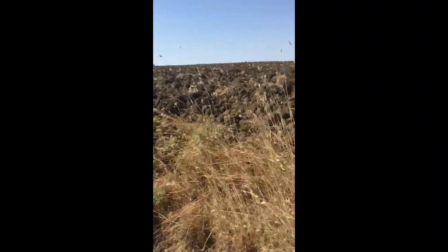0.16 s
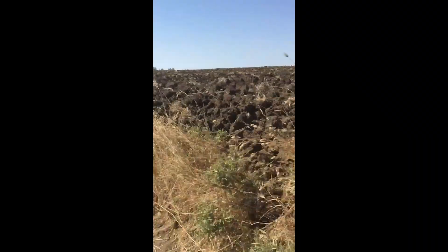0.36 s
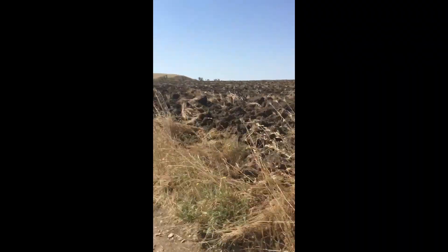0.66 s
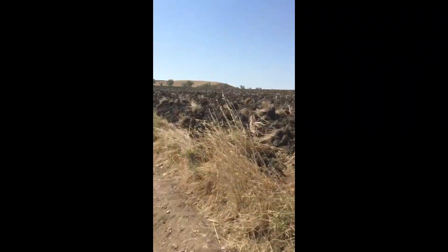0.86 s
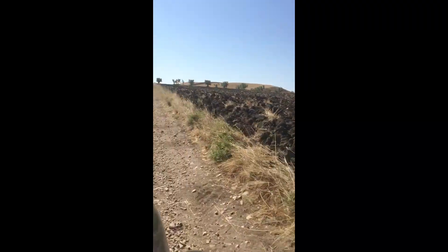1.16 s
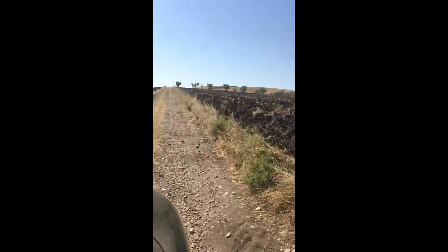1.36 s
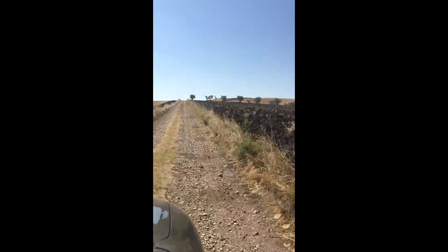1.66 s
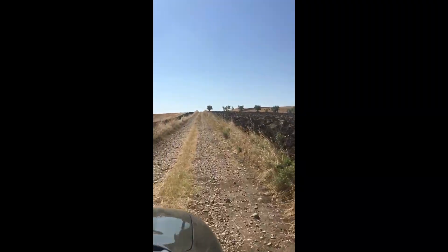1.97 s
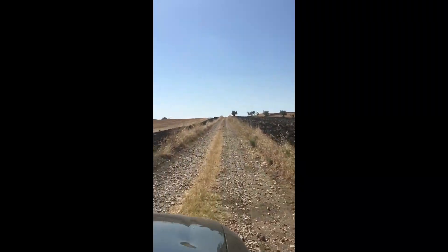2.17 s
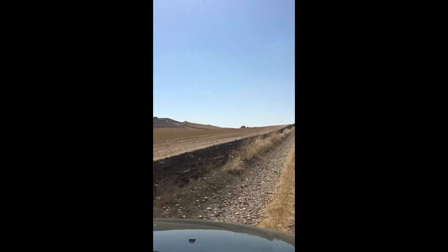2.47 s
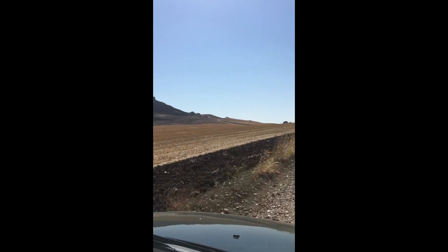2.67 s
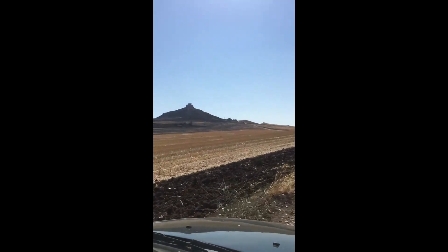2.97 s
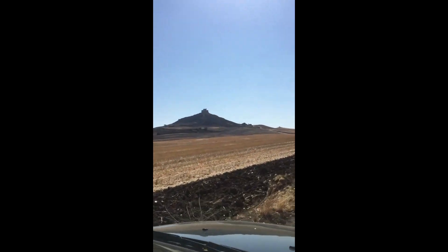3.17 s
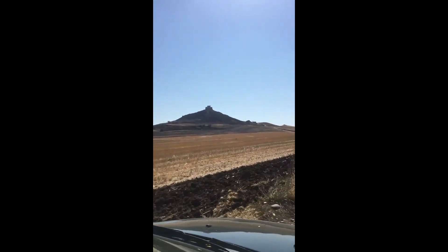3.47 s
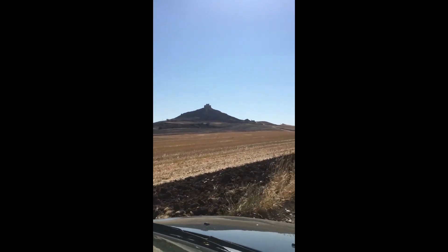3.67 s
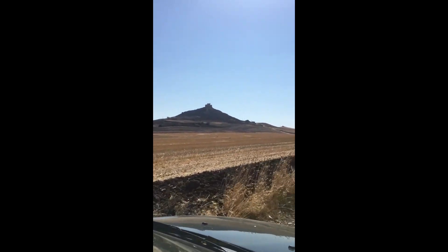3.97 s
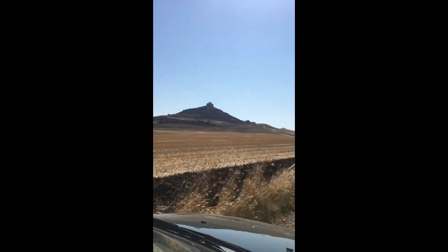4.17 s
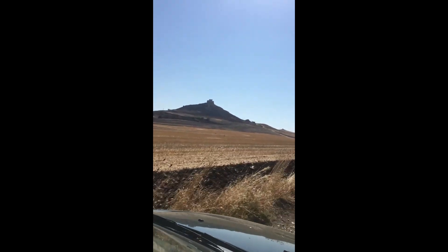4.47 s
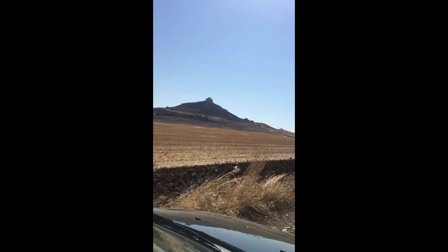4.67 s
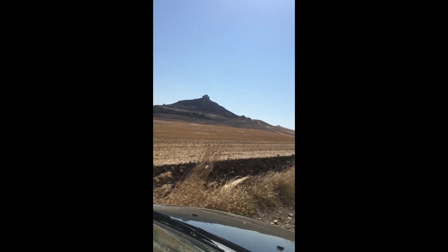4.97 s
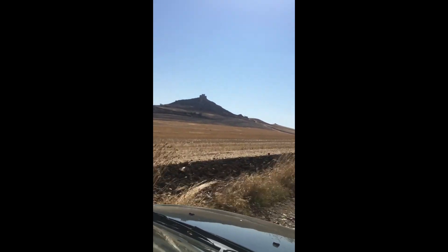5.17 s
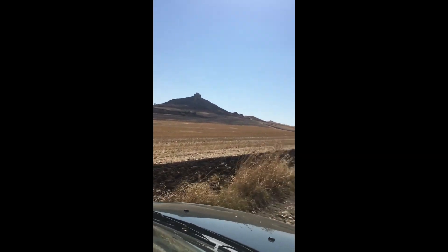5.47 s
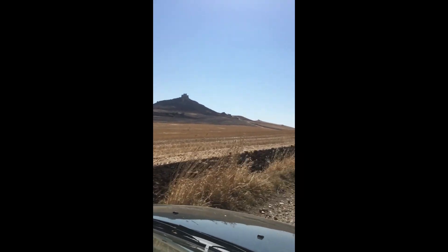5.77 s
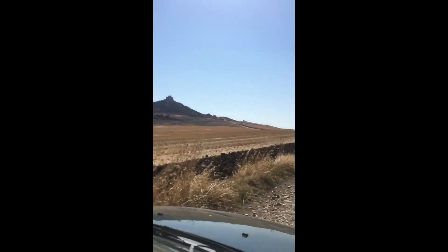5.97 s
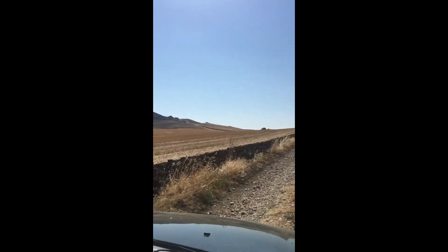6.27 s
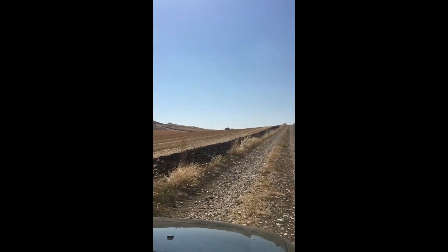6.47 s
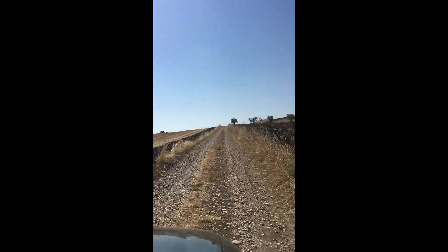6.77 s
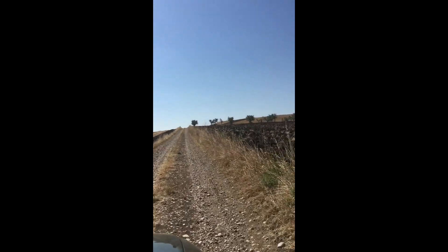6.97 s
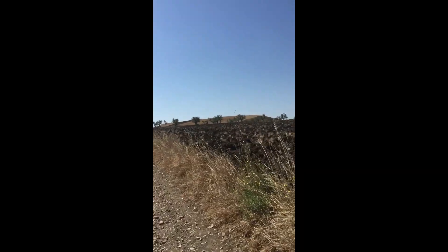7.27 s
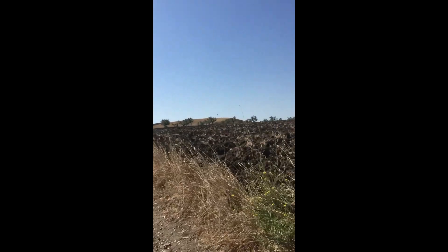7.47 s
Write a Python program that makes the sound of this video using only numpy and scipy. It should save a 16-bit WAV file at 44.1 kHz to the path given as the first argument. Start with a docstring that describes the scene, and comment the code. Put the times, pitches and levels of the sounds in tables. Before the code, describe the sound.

A car drives on a gravel track, heard from its open side window with the microphone in the airstream. Throughout, a deep rumble surges with ruts and tyres crunch small stones, quietening very slightly. From 0 to 1 s wind is strongest: airy hiss, fluttering gusts and blunt puffs, the hardest at 0.4 s, with a sharp grit tick near 0.5. Stones knock under the floor at 1.0 and in a run from 1.4 to 2.2 s, ending with a heavy thump at 2.1. After a calmer, less hissy second, a knock and gust hit at 3.3, then the loudest hollow clunk at 3.95. A low engine boom swells from 4 to 5.4 s, with knocks at 4.6 and 5.2 and a bright tick at 4.85. It dips near 5.9, returns from 6.3 to 7 and fades. Ticks come at 6.6 to 6.7; rumble, crunch and rising hiss continue to a last puff at 7.6.

```python
"""Tyres crunch along a gravel track under a rumbling car, heard at its open side window.
Filtered noise makes the rumble and roar, random grains the crushed stones; ruts jolt the rumble.
Stones knock under the floor as damped kicks with a noisy rattle, and grit ticks on the panels as noise bursts.
Wind hisses at the window frame and buffets the microphone in noise lumps and single puffs.
The engine booms as a sine at its firing rate, strongest near the cabin's air resonance."""
import sys
import numpy as np
from scipy import signal
from scipy.fft import rfft, irfft, next_fast_len
from scipy.io import wavfile
from scipy.ndimage import uniform_filter1d, map_coordinates

SR = 44100
rng = np.random.default_rng(int(sys.argv[2]) if len(sys.argv) > 2 else 0)


def generate_wav(sig):
    """Save sig (samples, or channels by samples) to the path in sys.argv[1] as 16-bit PCM at SR."""
    pcm = np.round(np.clip(np.atleast_2d(sig).T, -1, 1) * 32767).astype(np.int16)
    wavfile.write(sys.argv[1], SR, pcm)


N = 336042  # length in samples


def amp(db):
    """Level law: an amplitude ratio is ten to the power of dB / 20."""
    return 10 ** (np.asarray(db) / 20)


def unit(x):
    """Power normalisation: x scaled to rms 1."""
    return x / np.sqrt(np.mean(x ** 2) + 1e-20)


def curves(rows):
    """Linear interpolation: one value per sample for each column after the time."""
    seconds, *columns = np.transpose(rows)
    t = np.arange(N) / SR
    return [np.interp(t, seconds, column) for column in columns]


def wobble(rate):
    """Random modulation: a smooth curve through normally distributed knots, rate knots a second."""
    knots = rng.standard_normal(4096)
    return map_coordinates(knots, [np.arange(N) * rate / SR], mode="wrap")


def swell(t, length):
    """Raised-cosine envelope: a smooth rise and fall of height 1, length seconds either side of t = 0."""
    return np.cos(np.pi / 2 * np.clip(t / length, -1, 1)) ** 2


def shaped(x, spectrum):
    """Linear filtering: x is weighted in frequency by (Hz, dB) points on a log axis."""
    size = next_fast_len(len(x) + 8192)
    hz, db = np.transpose(spectrum)
    bins_hz = np.fft.rfftfreq(size, 1 / SR)
    gain = amp(np.interp(np.log(bins_hz + 1), np.log(hz), db))
    return irfft(rfft(x, size) * gain, size)[:len(x)]


def noise(spectrum, size=N):
    """Coloured noise: filtered white noise of rms 1."""
    return unit(shaped(rng.standard_normal(size), spectrum))


def grains(spectrum, rate, spread_db, t60):
    """Shot noise: about rate bursts a second of uneven size, each falling 60 dB in t60 s, at rms 1."""
    strikes = rng.random(N) < rate / SR
    energy = strikes * amp(spread_db * np.clip(rng.standard_normal(N), -2, 2)) ** 2
    fade = amp(-60 / (t60 * SR)) ** 2  # energy kept from one sample to the next
    envelope = np.sqrt(signal.lfilter([1], [1, -fade], energy))
    return unit(shaped(envelope * rng.standard_normal(N), spectrum))


def patchy(x, depth_db):
    """Time-frequency modulation: the gain flickers from band to band and moment to moment; rms 1."""
    z = signal.stft(x, nperseg=512)[2]
    field = rng.standard_normal(z.shape)
    field = uniform_filter1d(field, size=4, axis=0)  # across bands
    field = uniform_filter1d(field, size=3, axis=1)  # across time
    flickering = signal.istft(z * amp(depth_db * unit(field)), nperseg=512)[1]
    return unit(flickering[:len(x)])


def push(t, hz, rise, sag):
    """Damped oscillation: pressure peaks after rise cycles of the starting pitch hz, which then sags."""
    age = hz * t / rise
    envelope = (age * np.exp(1 - age)) ** 2
    return envelope * np.sin(2 * np.pi * np.log1p(sag * hz * t) / sag)


def add(track, s, sound):
    """Superposition: the sound is summed into the track from s seconds on."""
    start = max(round(s * SR), 0)
    room = track[start:start + len(sound)]
    room += sound[:len(room)]


# Engine speed. Each row: time in seconds, firing rate in Hz.
FIRING_RATE = [(0, 56.8), (1.2, 59.1), (2.7, 60.2), (3.2, 61.1), (4.1, 61.3), (4.6, 62.5), (5, 61.3),
               (6.6, 59.1), (7.62, 59.8)]
# How hard the engine pulls. Each row: time in seconds, nominal boom at resonance in dB.
LOAD_CURVE = [(0, -50), (1.2, -41.5), (3.8, -39), (4.1, -32.5), (5.4, -34), (5.9, -41), (6.3, -32.5),
              (7, -33.5), (7.62, -48)]
CABIN_HZ, CABIN_WIDTH_HZ = 62.5, 5.5  # the cabin's air resonance


def engine():
    """Forced resonance: the boom follows load, grows near the cabin resonance and throbs unevenly."""
    hz, = curves(FIRING_RATE)
    load_db, = curves(LOAD_CURVE)
    resonance = 1 / np.hypot(1, 2 * (hz - CABIN_HZ) / CABIN_WIDTH_HZ)
    phase = 2 * np.pi * np.cumsum(hz) / SR + 0.54 * wobble(9)
    throb_db = 2.9 * wobble(9)
    return resonance * amp(load_db + 2.5 + throb_db) * unit(np.sin(phase))


# The airstream at the window frame. Each row: time in seconds, air hiss in dB, fine fizz in dB.
AIRSTREAM_LEVELS = [(0, -53, -69), (.5, -53, -67), (1.4, -59, -66.5), (2, -57.5, -63.5), (2.3, -62.5, -71),
                    (3.2, -65, -77), (6.35, -62, -76), (7.1, -60.5, -73.5), (7.62, -58, -68)]
# Gusts on the microphone. Each row: peak time in seconds, rise and fall time (each) in seconds,
# nominal peak level in dB.
GUST_EVENTS = [(0.118, 0.12, -34), (0.602, 0.056, -33), (0.661, .04, -33), (0.798, 0.1, -32),
               (.89, 0.054, -32), (1.47, 0.096, -36), (1.72, 0.09, -38), (1.94, .08, -30),
               (2.024, .06, -33.5), (2.458, .1, -37.5), (3.083, 0.15, -40), (3.314, 0.047, -28.5),
               (3.616, 0.13, -36.5), (3.974, .06, -33), (4.269, 0.084, -32.5), (4.93, 0.069, -37.5),
               (5.57, 0.068, -33.5), (6.324, 0.053, -34.5), (6.76, 0.15, -38.5)]
# Eddies bursting on the microphone. Each row: start in seconds, nominal level in dB, nominal pitch in Hz.
PUFF_EVENTS = [(0.129, -19, 294), (0.317, -22, 517), (0.387, -8.5, 323), (0.658, -20.5, 383),
               (0.711, -15, 195), (.795, -17, 480), (0.8813, -16.5, 380), (1.178, -19.5, 126),
               (4.266, -23, 453), (5.676, -19.5, 367), (5.891, -19, 440), (6.731, -20, 227),
               (6.778, -21, 255), (7.603, -16.5, 282)]
# Spectra of the lumps, their flutter, the hiss and the fizz. Each row: frequency in Hz, relative level in dB.
LUMP_SPECTRUM = [(60, -23), (130, -9), (270, 3.5), (430, -8), (600, -5), (900, -24), (1400, -29),
                 (2500, -49), (6000, -64)]
FLUTTER_SPECTRUM = [(200, -10.5), (420, -1.5), (620, 3), (950, -4.5), (1400, -6), (2500, -38), (6000, -55)]
HISS_SPECTRUM = [(1500, -0.5), (3300, 4), (4400, -1), (5800, 1), (7000, -6.5), (9000, -4), (12000, -23),
                 (16000, -39)]
FIZZ_SPECTRUM = [(4000, -7), (8000, -6), (11000, 0.5), (16000, 0)]
BUFFET_DB, BUFFET_SWAY_DB = -40, 1.5  # the nominal buffeting between gusts, and how much it sways


def wind():
    """Turbulence: air hisses and sputters at the frame; gusts reach the microphone as lumps and puffs."""
    hiss_db, fizz_db = curves(AIRSTREAM_LEVELS)
    t = np.arange(N) / SR
    power = amp(BUFFET_DB + BUFFET_SWAY_DB * wobble(10)) ** 2
    for s, length, db in GUST_EVENTS:
        power = power + (amp(db) * swell(t - s, length)) ** 2
    buffet_db = 10 * np.log10(power)
    fast_lumps = amp(3.1 * wobble(90)) * noise(LUMP_SPECTRUM)
    lumps = amp(buffet_db - 2.0) * patchy(fast_lumps, depth_db=2.5)
    # stronger gusts break into smaller eddies: a brighter flutter that grows faster than the lumps
    flutter_db = -43.0 + 2.07 * (buffet_db + 34.5)
    flutter = amp(flutter_db) * grains(FLUTTER_SPECTRUM, rate=200, spread_db=6.0, t60=0.025)
    steady_hiss = amp(0.5) * noise(HISS_SPECTRUM)
    sputter = amp(-0.5) * grains(HISS_SPECTRUM, rate=140, spread_db=5.5, t60=0.033)
    hiss = amp(hiss_db) * patchy(steady_hiss + sputter, depth_db=2.5)
    fizz = amp(fizz_db + 0.6 * wobble(20)) * noise(FIZZ_SPECTRUM)
    air = lumps + flutter + hiss + fizz
    puff_t = np.arange(SR // 10) / SR
    for s, db, hz in PUFF_EVENTS:
        # the pitch starts high and has sagged close to hz at the peak
        add(air, s, amp(db) * push(puff_t, hz * 2.72, rise=1.92, sag=1.0))
    return air


# Grit on the panels. Each row: start in seconds, nominal level in dB, pitch in Hz, 60 dB decay in seconds.
GRIT_STRIKES = [(0.538, -25.5, 4600, 0.01), (.607, -28, 4570, 0.0092), (1.355, -44, 5600, .04),
                (1.4168, -31.5, 5900, 0.045), (1.605, -39.5, 8900, 0.061), (1.736, -42.5, 5480, .05),
                (1.914, -43, 5000, 0.17), (1.951, -43, 5000, .06), (2.016, -40, 6040, 0.028),
                (2.1476, -43, 10000, 0.018), (2.234, -47, 11000, .02), (2.7403, -45, 5970, 0.031),
                (2.922, -40, 9050, 0.016), (3.447, -45, 4500, .03), (3.947, -39.5, 4000, 0.069),
                (4.071, -42.5, 3880, 0.089), (4.455, -43.5, 6900, 0.045), (4.588, -44, 8000, .03),
                (4.8487, -30, 4900, 0.023), (5.029, -46, 7500, .025), (5.773, -43.5, 8010, 0.029),
                (6.5904, -37, 8380, 0.0076), (6.6323, -47, 9000, .04), (6.7074, -36, 8500, 0.059)]


def ticks():
    """Impact excitation: grit strikes the panels with a short bright splash around its own pitch."""
    track, t = np.zeros(N), np.arange(SR // 8) / SR
    for s, db, hz, t60 in GRIT_STRIKES:
        spectrum = [(hz / 4, -28), (hz / 4.8, -8), (hz, 0), (hz * 1.57, -9), (hz * 3, -26)]
        splash = noise(spectrum, size=len(t))
        onset = 1 - np.exp(-t / 0.0002)
        add(track, s, amp(db - 4.0 - 60 * t / t60) * onset * splash)
    return track


# Stones under the floor. Each row: start in seconds, nominal level in dB, nominal pitch in Hz,
# nominal rattle in dB relative to that level.
STONE_KNOCKS = [(0.4173, -19.5, 880, -13), (0.664, -26, 1360, -10), (1.0135, -21, 1150, -16),
                (1.356, -18, 950, -13), (1.4188, -16, 680, -10), (1.505, -20.5, 810, -18),
                (1.531, -25, 1245, -24), (1.7385, -18, 680, -1), (1.905, -21, 1220, -8),
                (2.0945, -10, 480, -6), (2.138, -21.5, 1130, -28), (2.184, -19.5, 680, -18),
                (3.3072, -11.5, 640, -11.5), (3.329, -33, 851, -23), (3.4462, -17, 1200, -15),
                (3.6, -17, 1110, -11), (3.614, -21, 985, -16), (3.9468, -8.5, 407, -4),
                (3.954, -14.5, 875, -10.5), (3.975, -17, 1000, -12), (4.151, -21, 1060, -22),
                (4.296, -22.5, 1400, -10.5), (4.588, -13, 1220, -17), (4.885, -21.5, 889, -14.5),
                (5.116, -27, 1106, -7), (5.2275, -18.5, 484, -7), (5.801, -24, 780, -8)]
# What the floor lets through to the cabin. Each row: frequency in Hz, gain in dB.
FLOOR_TRANSMISSION = [(2500, -0.5), (3100, -4), (5000, -14), (12000, -16)]


def knocks():
    """Impact and transmission: stones crack, kick, thud and rattle the pan, heard through the floor."""
    track, t = np.zeros(N), np.arange(SR // 6) / SR
    for s, db, hz, rattle_db in STONE_KNOCKS:
        crack = amp(-20) * push(t, 2050, rise=0.58, sag=0.43)
        kick = amp(-2.5) * push(t, hz * 1.49, rise=1.0, sag=0.36)
        thud = amp(-11.0) * push(t, hz * 0.5, rise=1.0, sag=0.19)
        spectrum = [(hz / 5, -18), (hz / 2, -5), (hz, 0), (hz * 2, -6), (hz * 5, -27), (hz * 16, -50)]
        rattle = noise(spectrum, size=len(t))
        rattle *= amp(rattle_db + 0.5 - 60 * t / 0.05)  # falls 60 dB in 0.05 s
        rattle *= 1 - np.exp(-t / 0.0014)
        add(track, s, amp(db) * (kick + crack + thud + rattle))
    return shaped(track, FLOOR_TRANSMISSION)


# Ruts and bumps that jolt the body. Each row: peak time in seconds, nominal peak rumble in dB.
RUT_JOLTS = [(.02, -26.5), (.375, -28.5), (.71, -28), (1.17, -36), (1.4, -32), (1.94, -31), (2.13, -23),
             (2.3, -27), (2.46, -26.5), (2.65, -31), (3.14, -29), (3.29, -27), (3.6, -23.5), (3.73, -27),
             (4, -25.5), (4.13, -28), (4.29, -28.5), (4.64, -22.5), (4.89, -22.5), (5.2, -26),
             (5.33, -29.5), (5.54, -31), (5.82, -24), (5.94, -30), (6.54, -26.5), (6.73, -27), (6.85, -27),
             (7.16, -26), (7.43, -29)]
# Spectra of the body's rumble, the tyres' roar and the crushed stones.
# Each row: frequency in Hz, relative level in dB.
RUMBLE_SPECTRUM = [(15, -49), (25, -25), (33, 1), (45, -2.5), (70, 1.5), (100, -2), (140, -5), (200, -15),
                   (400, -30), (1000, -71)]
TYRE_SPECTRUM = [(150, -0.5), (400, 2.5), (620, 4.5), (1000, -2.5), (1300, 0), (1620, -3), (1800, -0.5),
                 (2150, -9.5), (3600, -18), (5000, -25.5), (9000, -31), (16000, -45)]
STONE_SPECTRUM = [(120, -21), (300, -0.5), (650, -2), (1200, -4), (1900, -24), (3000, -18), (6000, -33),
                  (16000, -45)]
RUMBLE_DB, RUMBLE_SWAY_DB = -34, 2  # the nominal rumble between ruts, and how much it sways
RUT_RISE_S, RUT_FALL_S = 0.03, 0.039  # a jolt builds quickly, then the suspension settles
CRUNCH_DB, CRUNCH_DB_PER_S = -40, -0.27  # the tyres quieten gradually


def road():
    """Random excitation: ruts jolt the rumbling body; tyres roar and crush a stream of small stones."""
    t = np.arange(N) / SR
    power = amp(RUMBLE_DB + RUMBLE_SWAY_DB * wobble(8)) ** 2
    for s, db in RUT_JOLTS:
        rise = swell(np.minimum(t - s, 0), RUT_RISE_S)
        fall = np.exp(-np.maximum(t - s, 0) / RUT_FALL_S)
        power = power + (amp(db) * rise * fall) ** 2
    rumble = np.sqrt(power) * amp(2.1 * wobble(45)) * noise(RUMBLE_SPECTRUM)
    roar = amp(-1.0) * noise(TYRE_SPECTRUM)
    stones = amp(-4.5) * grains(STONE_SPECTRUM, rate=110, spread_db=6.0, t60=0.047)
    crunch = amp(CRUNCH_DB + CRUNCH_DB_PER_S * t) * patchy(roar + stones, depth_db=1.5)
    return rumble + crunch


def scene():
    """Superposition: all the sources add at one microphone in the window."""
    return (engine() + wind() + ticks() + knocks() + road())[None]


# The microphone port's dips and peaks. Each row: frequency in Hz, gain in dB.
PORT_RESPONSE = [(2400, 1), (2880, -3.5), (3150, 2), (4200, -0.5), (4900, -4), (5800, 1.5), (7200, -1.5),
                 (8000, -4.5), (8700, -1.5), (9900, -1.5), (10450, -3.5), (10850, -1.5), (11400, 0)]
TOP_HZ = 15820  # the recorder's band limit


def record(dry):
    """Band limiting: the port colours the treble and the recorder keeps nothing from its limit up."""
    size = next_fast_len(N + 8192)
    heard = shaped(dry[0], PORT_RESPONSE)
    passed = np.fft.rfftfreq(size, 1 / SR) < TOP_HZ
    return irfft(rfft(heard, size) * passed, size)[None, :N]


dry = scene()
out = record(dry)
generate_wav(out)
```